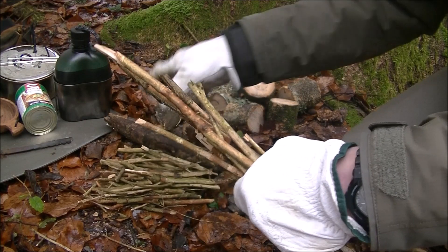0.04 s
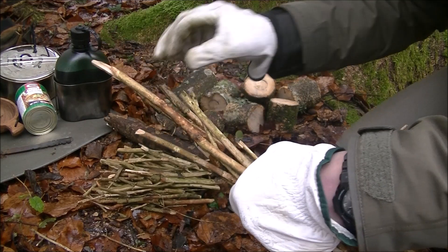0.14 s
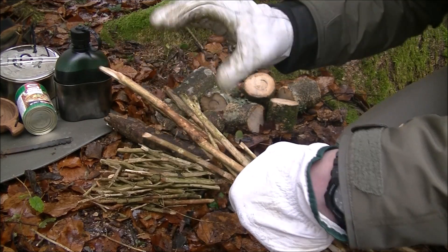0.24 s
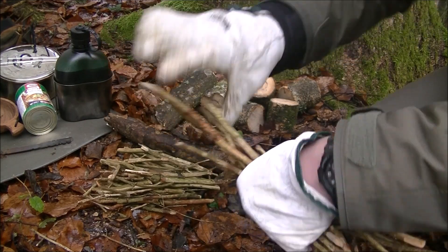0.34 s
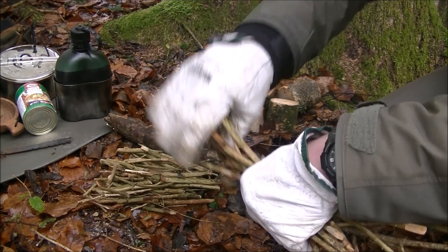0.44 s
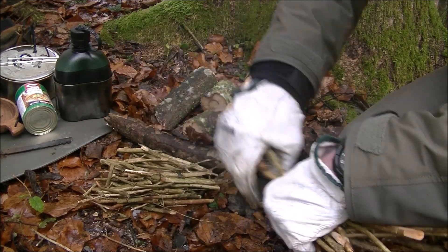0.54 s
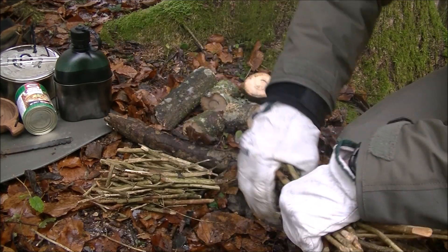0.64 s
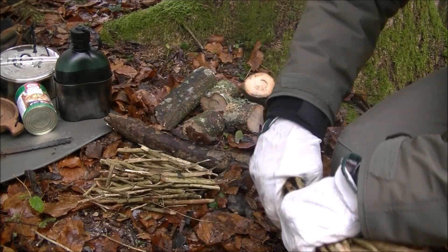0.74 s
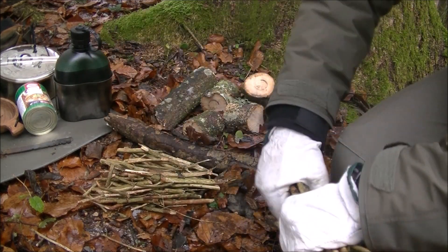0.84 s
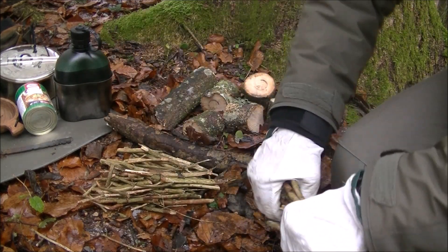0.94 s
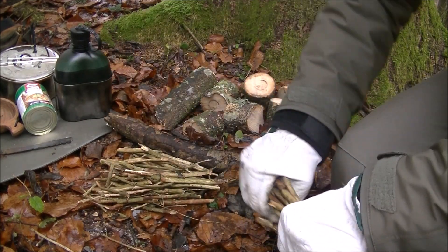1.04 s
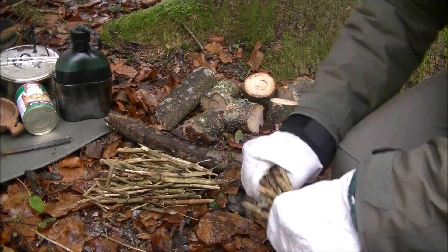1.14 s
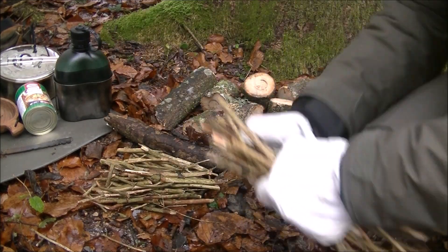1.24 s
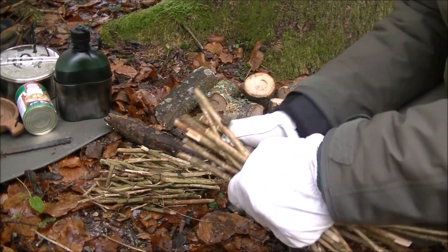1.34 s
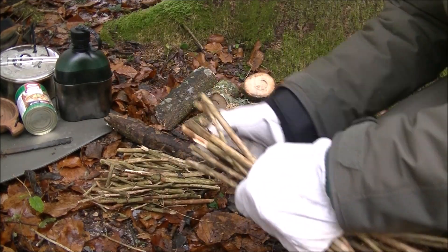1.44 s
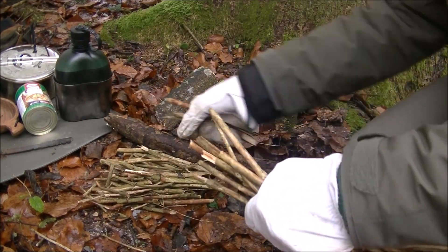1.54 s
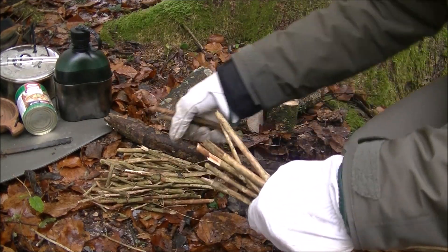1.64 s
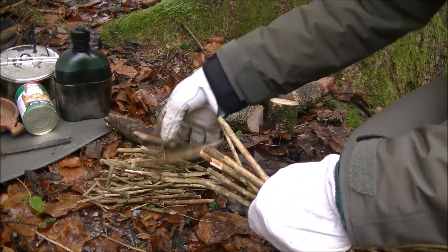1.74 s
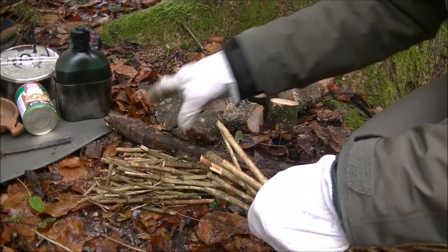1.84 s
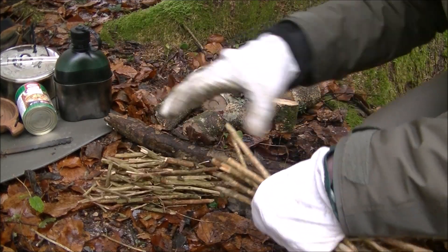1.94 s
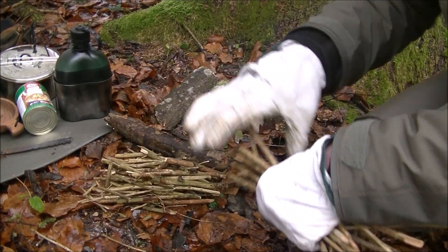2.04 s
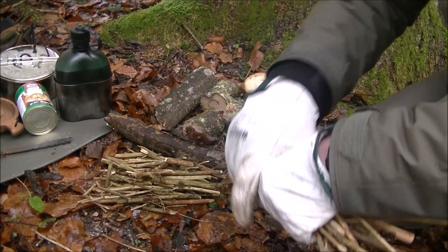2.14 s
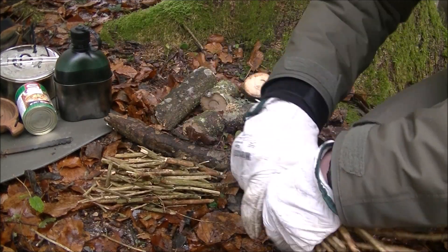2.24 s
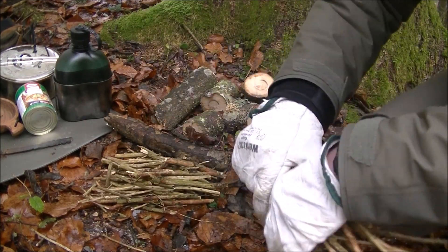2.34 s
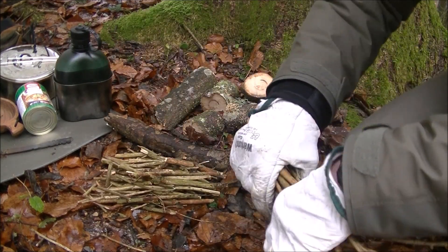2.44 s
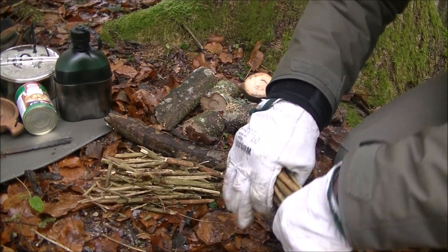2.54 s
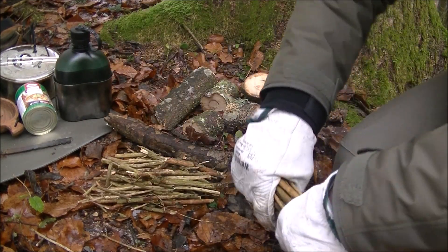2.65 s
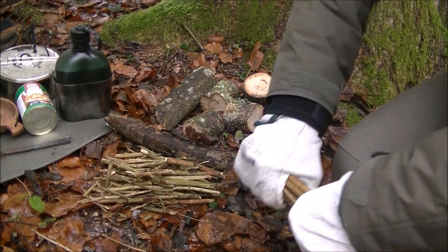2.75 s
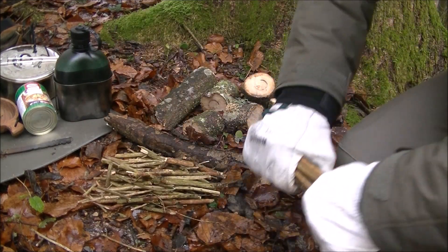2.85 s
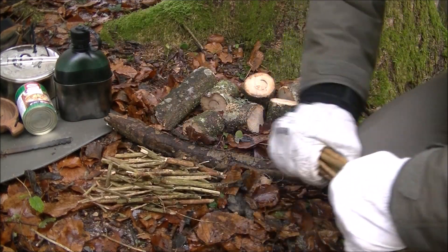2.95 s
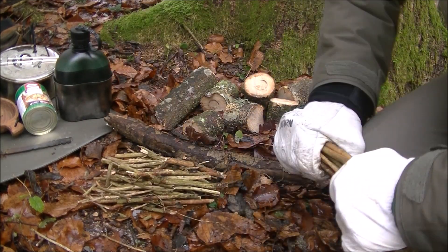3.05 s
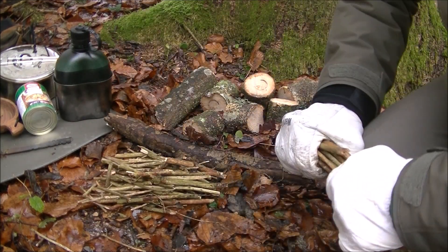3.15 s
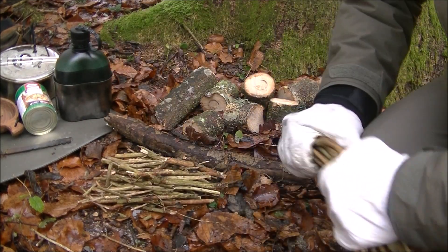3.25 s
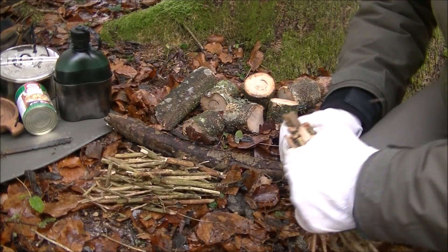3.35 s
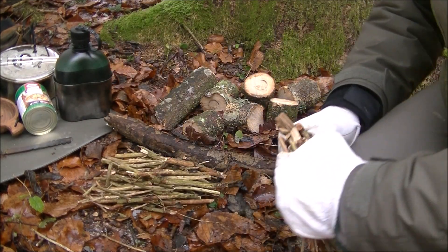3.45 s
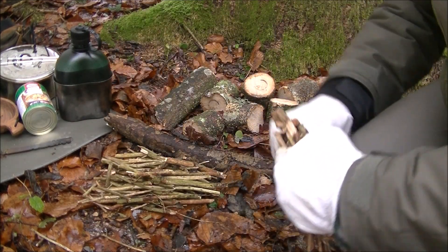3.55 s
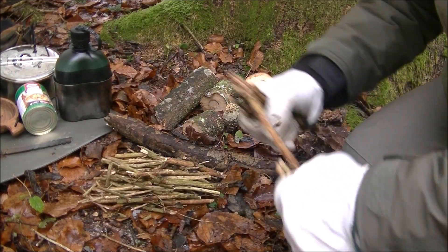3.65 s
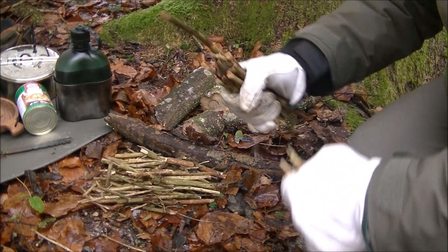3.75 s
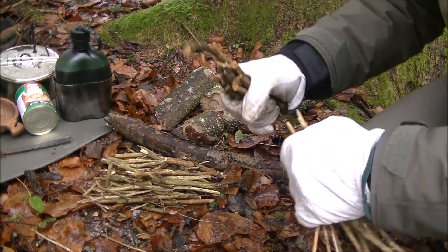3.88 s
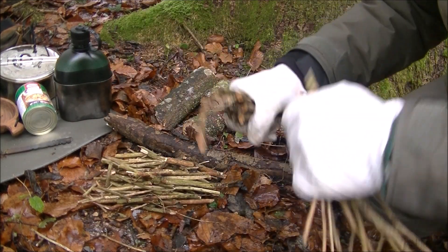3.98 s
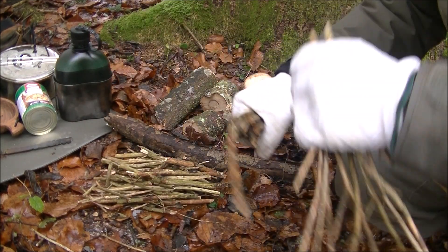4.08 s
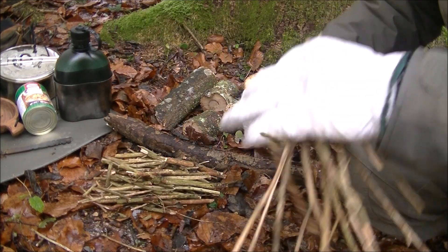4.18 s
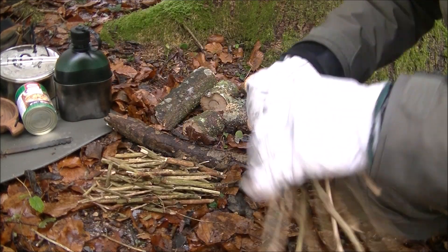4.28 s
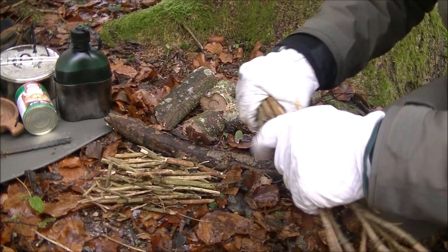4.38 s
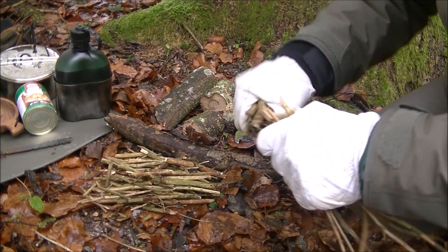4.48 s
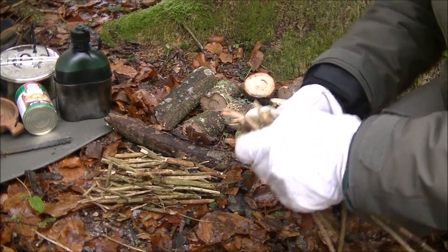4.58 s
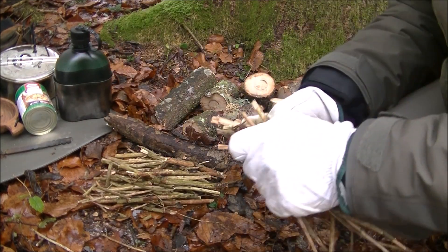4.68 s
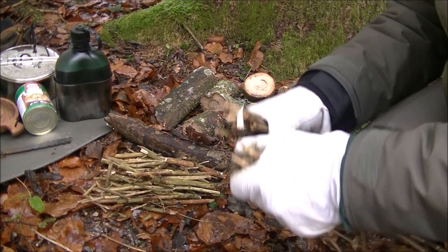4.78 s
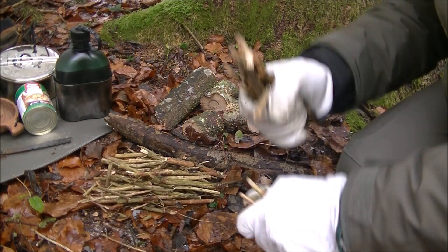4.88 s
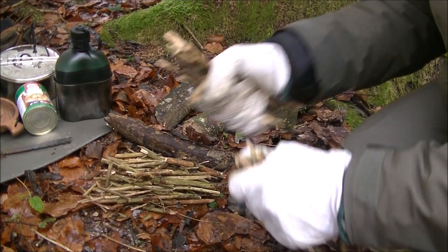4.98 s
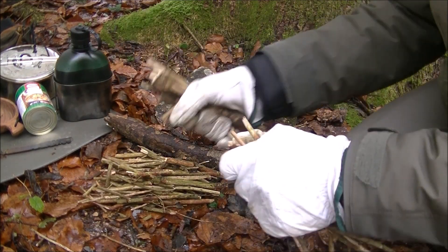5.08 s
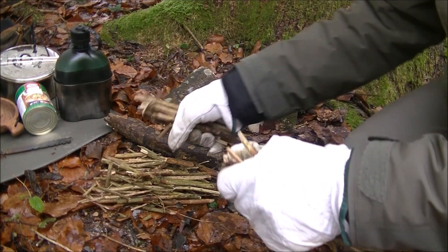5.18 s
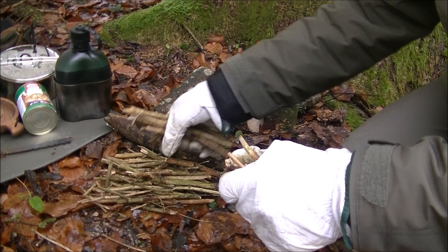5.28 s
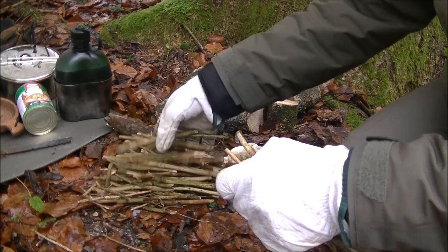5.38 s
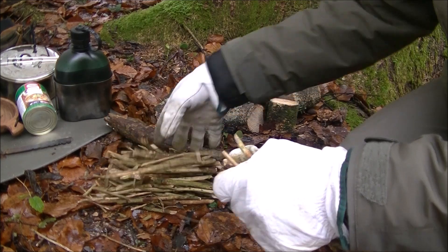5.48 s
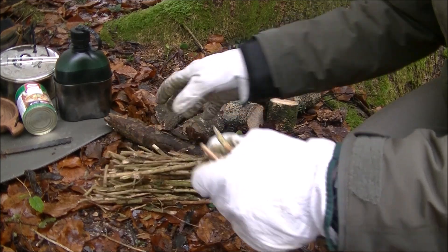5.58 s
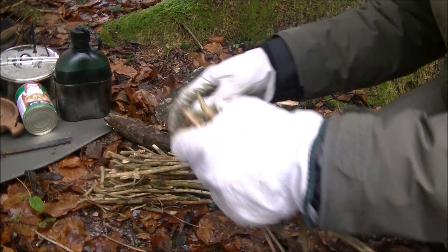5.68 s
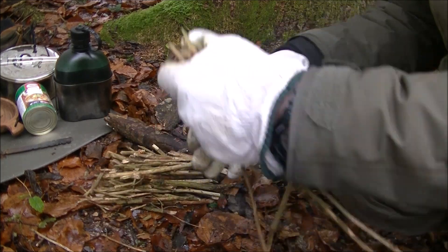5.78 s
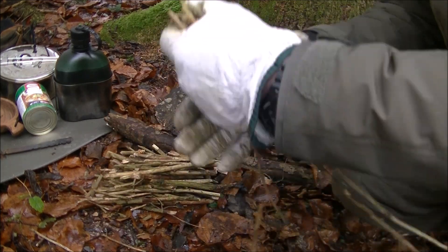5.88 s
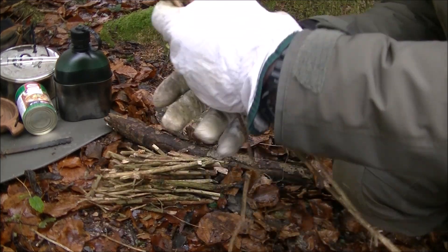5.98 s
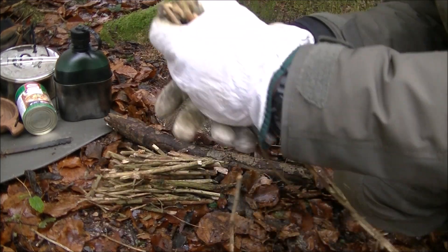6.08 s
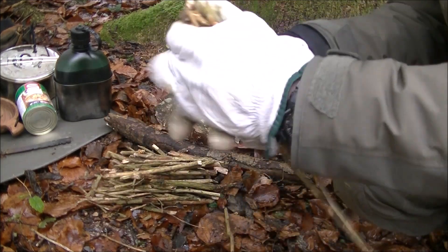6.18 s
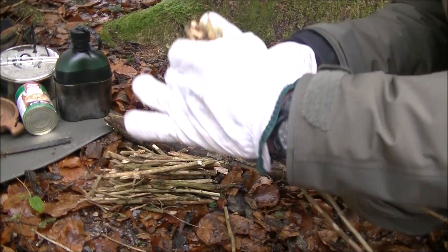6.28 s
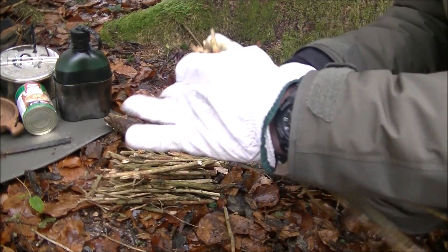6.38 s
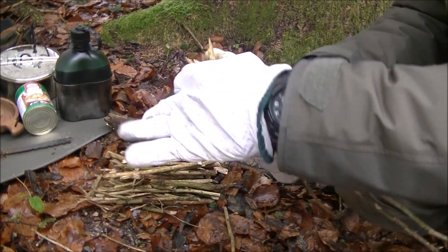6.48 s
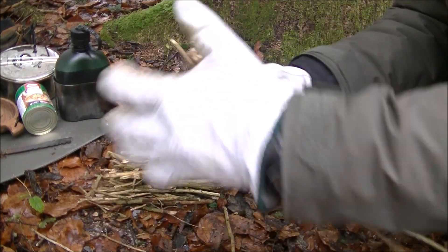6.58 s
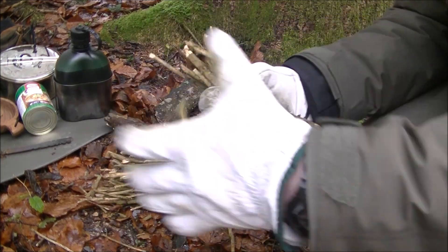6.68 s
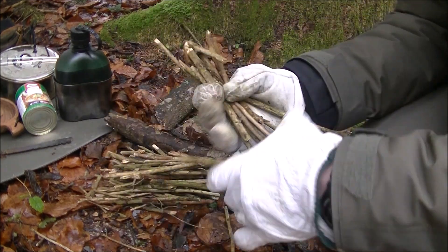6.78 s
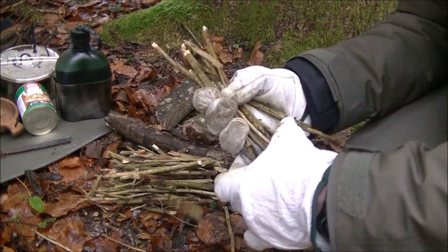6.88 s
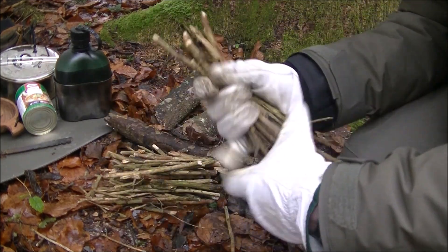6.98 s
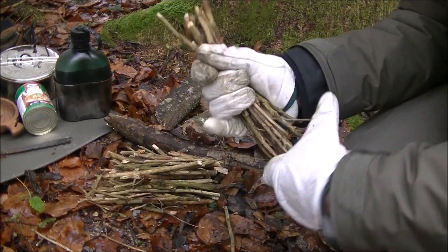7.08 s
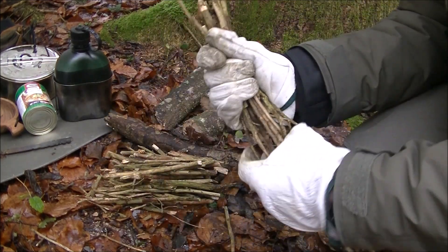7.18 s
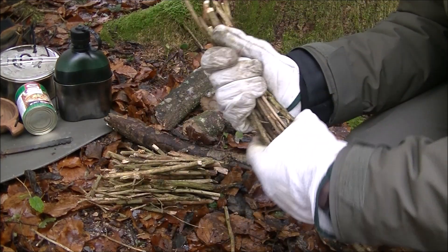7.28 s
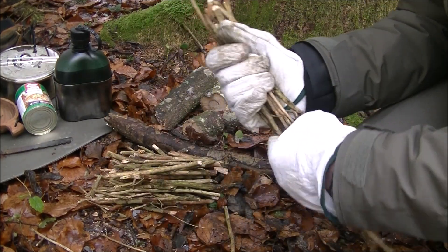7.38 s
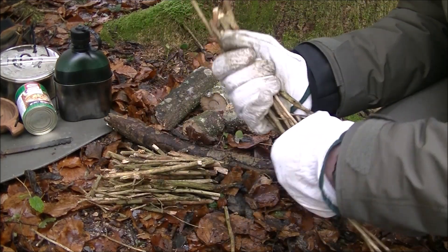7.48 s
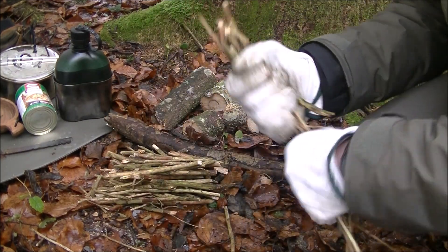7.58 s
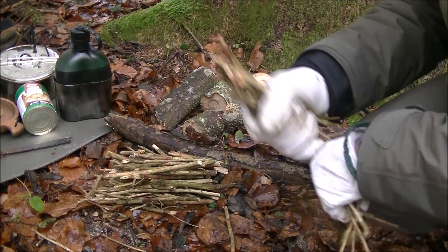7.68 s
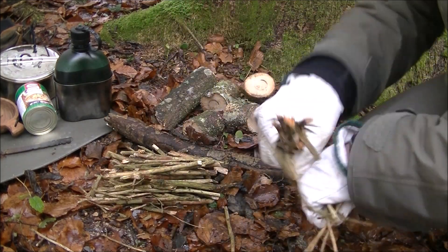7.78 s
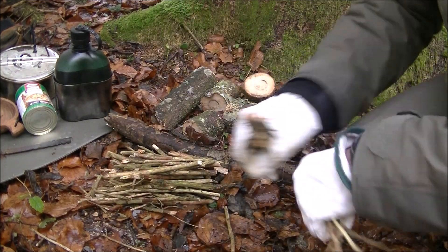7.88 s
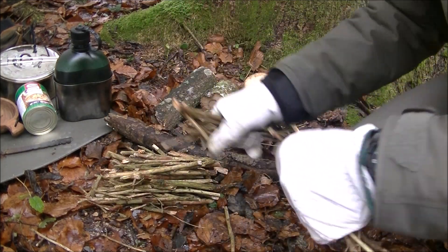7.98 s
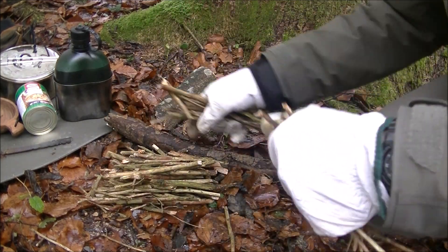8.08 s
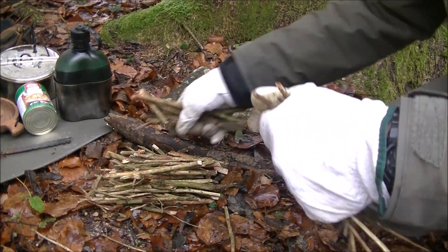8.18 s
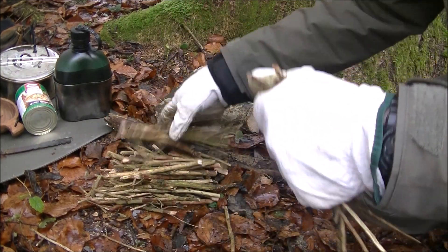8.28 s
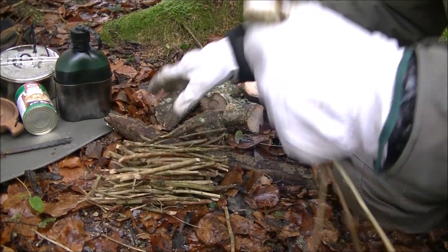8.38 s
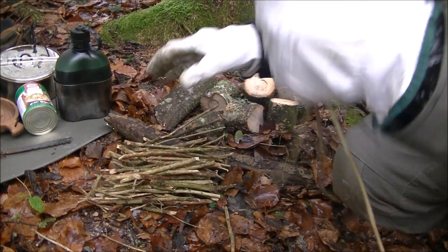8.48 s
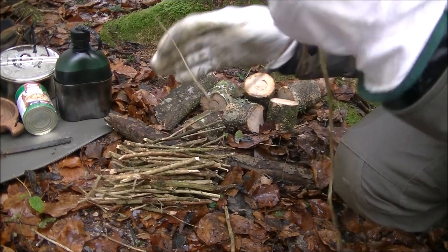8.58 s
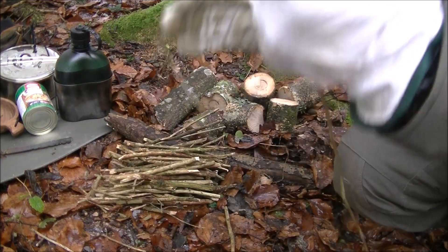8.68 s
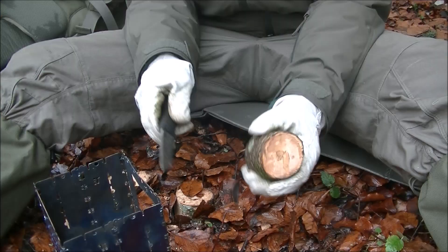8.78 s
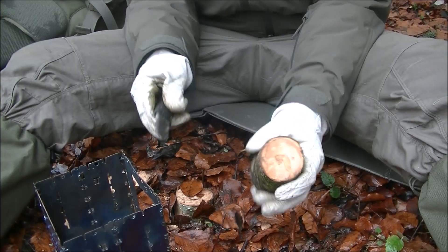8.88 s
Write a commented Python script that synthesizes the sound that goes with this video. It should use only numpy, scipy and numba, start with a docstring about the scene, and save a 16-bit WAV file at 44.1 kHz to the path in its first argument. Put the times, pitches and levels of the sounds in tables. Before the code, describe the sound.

Brittle woody snaps, very near a small stereo microphone outdoors, over an even hiss of far-off running water. Bark and gloves scratch and rustle, thicker sticks bump dully, and two low knocks jolt the stand early. Isolated cracks tighten into three fierce crackling runs, the second long and dense, the last short and sharp, before the handling thins to a few small ticks. Little echo, only faint woodland scatter.

```python
"""Gloved hands gather, bend and break a bundle of dead twigs close to a small stereo camera in a damp wood.
From the start far-off running water hisses (shaped noise), bark and gloves rustle (dense random clicks)
and low rumble stirs (slow noise). Fibres crack singly (noise bursts ringing twig modes), thicker sticks bump
(low damped modes), and before 1 s two knocks come through the stand (a bank of modes). Cracks run together
near 1.2, 3.2 and 7.6 s; gain control ducks at the loudest, then recovers."""
import sys
import numpy as np
from scipy import signal
from scipy.fft import rfft, irfft
from scipy.io import wavfile
from scipy.ndimage import uniform_filter1d
from numba import njit

SR = 44100
rng = np.random.default_rng(int(sys.argv[2]) if len(sys.argv) > 2 else 0)


def makeup_ratio(level_db):
    """Linear amplitude ratio for a level in decibels (20 dB per factor of ten)."""
    decades = np.asarray(level_db, float) / 20
    return 10 ** decades


def transcribe(signal):
    """Save signal, clipped to [-1, 1], as a 16-bit WAV file at the path in sys.argv[1]."""
    frames = np.atleast_2d(signal).T
    limited = np.clip(frames, -1, 1)
    pcm = np.round(limited * 32767).astype(np.int16)
    wavfile.write(sys.argv[1], SR, pcm)


N = 393813

# gloves working the bundle: start_s, level_db (of the fine treble), brightness_db (relative)
HANDLING = [(0.0, -55.5, -4), (0.234, -57, -8), (0.31, -47.5, -2), (0.576, -44.5, 1), (0.9, -49.5, -7.5),
            (1.17, -47.5, 7), (1.241, -30, -4), (1.3, -32.5, -1), (1.4, -43, 0), (1.68, -46, 2),
            (1.759, -62.5, -9), (2.019, -48.5, 1), (2.52, -57.5, -3), (2.55, -31.5, 4), (2.65, -44, -2.5),
            (3.059, -55.5, -0.5), (3.21, -42.5, -0.5), (3.27, -28, 6), (3.451, -43, -2.5),
            (3.669, -42, 3.5), (3.77, -50.5, -4), (4.601, -42, 1.5), (5.001, -51, -4), (5.318, -66, -11),
            (5.871, -45.5, -2.5), (6.0, -58, -2), (6.209, -43, 2.5), (6.3, -62.5, 3), (6.65, -51.5, -4),
            (6.87, -54.5, -3.5), (7.038, -41, -1.5), (7.1, -56, 0), (7.57, -46.5, -2), (7.641, -34, 10),
            (7.75, -36.5, 2), (7.89, -58, -7), (8.641, -65, 4), (8.84, -49, -2), (8.93, -53, 0)]
# spectrum of rubbing bark and gloves as finally heard, closed at 16 kHz: frequency_hz, density_db (relative)
RUSTLE_SPECTRUM = [(300, -53), (800, 6), (1400, 0), (2200, 8.5), (4200, 4), (6500, 7.5), (9000, 1),
                   (12000, 2), (14500, 1.5), (15700, -14), (16000, -70)]
# spectrum of distant water as finally heard, closed at 16 kHz: frequency_hz, density_db (relative)
WATER_SPECTRUM = [(15, -83), (25, -38), (200, -17), (290, -12.5), (590, -5.5), (1150, -2), (2300, -3),
                  (3500, -5), (4500, -10), (5000, -12.5), (7200, -14), (8200, -26.5), (9500, -23.5),
                  (13500, -29), (15700, -39), (16000, -70)]
# stereo width of the water: frequency_hz, side_over_mid_db (before an overall trim)
WATER_WIDTH = [(60, -9), (110, 3), (200, -1.5), (380, -7), (700, -11.5), (1290, -13.5), (2380, -12),
               (4400, -9.5), (8120, 1.5), (15000, -1)]
# stereo balance of the water: frequency_hz, left_over_right_db
WATER_BALANCE = [(60, 1), (110, -3.5), (200, -4), (380, -4.0), (700, -4), (1290, -4), (2380, -4),
                 (4400, -3), (8120, 6.5), (15000, -4)]
# air stirred by the sleeves: start_s, level_db
AIR_PUFFS = [(1.27, -46), (2.17, -68), (3.2, -62), (3.72, -63), (4.16, -70), (4.58, -63), (4.8, -60),
             (6.92, -57), (8.83, -72)]
# cracks that stand out: start_s, level_db, pitch_hz (twig ring), treble_db (over the body), left_over_right_db
CRACKS = [(0.1466, -12, 2190, -26, -5), (0.2896, -23, 4260, 2, -1), (0.295, -14, 4100, -18, -6),
          (0.3804, -26, 3100, 3, -3), (0.5506, -19, 3980, -23, -5), (0.6338, -17.5, 1380, -8, -4),
          (1.0196, -11, 5470, -3, -7), (1.069, -7, 4500, 4.5, 2), (1.12, -15.5, 4000, 7.5, 2),
          (1.1916, -4, 4550, 4, -5), (1.2018, -3.5, 4460, 4, 10), (1.225, -8, 1240, -4, 1),
          (1.2285, -2, 3550, -1, -3), (1.232, -17, 4070, 1, -3), (1.235, -4, 3120, -13, -2),
          (1.239, 1, 4100, -10, 0), (1.2477, -4, 4750, 2.5, -6), (1.2685, -13, 3190, -2, -7),
          (1.3064, -23, 4160, -15, -2), (1.3209, -2, 2030, -35, -1), (1.336, 2.5, 1290, -36, -4),
          (1.781, -25.5, 2150, 3, -3), (1.8117, -22.5, 4260, -3, -6), (2.0165, -24.5, 3920, 3, 5),
          (2.2343, -13.5, 6370, -6, 3), (2.26, -21, 4130, -4, -2), (2.3516, -12.5, 2300, -2, -1),
          (2.3997, -13, 2540, 2.5, 0), (2.5344, -13, 3600, -5, -4), (2.541, -15, 5450, 0, 0),
          (2.5718, -16, 2780, -13, -2), (2.5885, -23, 4200, -4, 0), (2.6865, -24, 4410, 2, -2),
          (2.7073, -8.5, 3600, 1.5, 6), (2.7235, -27, 4150, 8, 4), (2.7268, -12.5, 3480, 9, -4),
          (2.7342, -29, 4590, 2, -1), (2.7931, -32, 1550, 9, -1), (2.8184, -25.5, 2670, 9, 1),
          (2.8821, -9, 1100, -18, -3), (2.9274, 2, 5050, -2, -1), (2.9341, -26, 3770, -55, -12),
          (2.9379, -25, 4120, 3, -1), (3.0466, -22.5, 2630, -1, -2), (3.0904, -28, 3600, 4, 0),
          (3.1161, -9.5, 6560, 2, 6), (3.1343, -1, 4000, -17, -5), (3.149, -1, 4140, -10, -2),
          (3.17, -6.5, 6500, 8, 2), (3.2265, 3.5, 3700, -7, -1), (3.231, -15, 3600, -13, -4),
          (3.2373, -1, 4300, -6, 1), (3.2424, -13, 3800, 13, -1), (3.249, -15, 4410, 2, -2),
          (3.2538, -10, 3530, 4, -3), (3.2581, -13, 6310, 5, -1), (3.2614, -12, 4160, 11, 2),
          (3.271, -11, 4010, 3, -1), (3.2751, 1, 3760, 2, 0.5), (3.2855, -4, 3830, 4, -6),
          (3.303, 0.5, 4500, -2, 4), (3.309, -13, 4410, -6, 0), (3.3119, -1, 3570, 1, -2),
          (3.341, -9.5, 1710, -1, -4), (3.3597, -9, 2860, 0, 0), (3.3627, -11, 4290, -17, -5),
          (3.372, -9.5, 2650, -13, -3), (3.3786, -7, 6960, -8, 2), (3.4232, -2, 1980, -10, -2),
          (3.4253, -5.5, 4160, -19, -3), (3.48, -14, 2420, -6, -3), (3.5775, -18.5, 4000, -10, -2),
          (3.6831, -15, 1520, -9, -3), (3.7673, -18.5, 1630, -26, -3), (3.873, -19, 5940, -11, -1),
          (3.903, -20, 2330, -20, -2), (3.9446, -15, 2870, -19, -13), (4.0415, -13.5, 3020, -24, -4),
          (4.3287, -14.5, 3040, -21, -5), (4.401, -21, 1710, -20, -3), (4.469, -21, 1570, -16, -3),
          (4.4929, -20, 2410, -4, 3), (4.5374, -12.5, 3850, -12, -2), (4.5591, -9.5, 3200, -5, -4),
          (4.567, -13, 2200, -20, -3), (4.596, -7, 4330, -6, -3), (4.6, -4, 4300, 1, -5),
          (4.6115, -27, 2070, 15, 2), (4.736, -13.5, 1380, -21, -4), (4.7715, -18, 4040, 6, -1),
          (4.7832, -16, 4870, 0, -4), (4.7877, -11, 3220, -3, -2), (4.8266, -15, 3020, 14, -1),
          (5.0586, -14, 2070, -17, -2), (5.062, -12.5, 3580, -25, -2), (5.035, -17, 2110, -12, -5),
          (5.0986, -20, 2090, -18, -2), (5.0918, -16, 3040, -18, -4), (5.275, -18.5, 4770, -31, -3),
          (5.403, -17.5, 4200, -1.5, -2), (5.4314, -14.5, 4750, -13, -3), (5.722, -21, 2930, -20, -3),
          (5.7323, -4.5, 2450, -34, -4), (5.8807, -12, 2370, -5, -1), (6.142, -18, 1480, -15, -3),
          (6.2425, -11, 3120, 4, -9), (6.401, -24, 2480, 1.5, -1), (6.4177, -13, 1230, -21, -4),
          (6.5432, -17.5, 3530, -12, -4), (6.587, -15, 1460, -18, -4), (6.6182, -16, 2460, -28, -4),
          (6.7147, -11, 2150, -39, -2), (6.742, -13.5, 4800, 5.5, 0), (6.782, -18, 3820, 6, 1),
          (6.8216, -10.5, 2230, -19, -2), (6.917, -7.5, 6500, -12, -1), (6.93, -10.5, 4250, -7, -5),
          (6.936, -6, 6000, -12, 5), (7.0029, -8.5, 2460, -2, -2), (7.0075, -3, 2500, -23, -1),
          (7.0147, -5, 2440, -7, -3), (7.0335, -17, 4590, 10, 0), (7.1287, -6, 4600, -9, -3),
          (7.1354, -20, 4360, 11, 6), (7.1424, -3.5, 2380, -5, -1), (7.156, -1.5, 6300, -13, -3),
          (7.3144, -22.5, 4000, -9, -3), (7.4655, -16, 2000, -19, -3), (7.476, -17, 4910, -11, -1),
          (7.5006, -11, 4700, -11, -2), (7.5944, -2, 3930, -6, -8), (7.6069, -8, 3750, 4.5, 7),
          (7.6096, -6, 4120, 2, -4), (7.6178, -10, 4220, -2, 0), (7.6232, -6, 3930, -1, -7),
          (7.629, -9, 4070, 3, -5), (7.644, -9, 2880, 9, 6), (7.6595, -14.5, 6780, 13, -7),
          (7.683, -5, 4410, 2, -1), (7.6885, -8, 4350, -9, -4), (7.707, -3, 1780, 2.5, -3),
          (7.7291, 4, 4500, -5, -4), (7.7316, -13, 4180, -6, -1), (7.7406, -16, 3490, -11, 7),
          (7.746, 4, 4080, -7, -3), (7.7567, -7.5, 2650, -17, -4), (8.301, -19.5, 1870, -21, -4),
          (8.325, -17, 3360, -4, -2), (8.338, -14.5, 1830, -15, -3), (8.8755, -18, 6100, -23, 1)]
# dull bumps of thicker sticks: start_s, level_db, pitch_hz
BUMPS = [(0.302, -19.5, 1000), (0.374, -27, 1160), (1.223, -14, 985), (1.237, -11.5, 1160),
         (1.319, -15, 1240), (1.333, -56, 1170), (1.496, -34, 350), (2.88, -12, 1010), (2.884, -15.5, 725),
         (3.147, -14.5, 1220), (3.339, -23, 1090), (3.408, -29, 804), (3.74, -23, 1050),
         (3.765, -28.5, 474), (4.035, -24.5, 770), (4.466, -28, 435), (4.516, -27.5, 740),
         (4.558, -17, 950), (4.733, -28.5, 330), (4.929, -34.5, 285), (6.068, -27.5, 580),
         (6.144, -24.5, 754), (6.212, -23.5, 664), (6.782, -26, 633), (6.82, -23.5, 1070),
         (7.008, -19.5, 1160), (7.141, -23.5, 930), (7.554, -24.5, 1040), (7.726, -30, 965),
         (7.737, -17, 835)]
# knocks on the stand: start_s, level_db, hardness_db
KNOCKS = [(0.789, -5, -6), (0.887, -7, 8)]
# modes of the stand: pitch_hz, mid_db, side_db, t60_s, hardness_share (0-1)
STAND_MODES = [(164, -16, -17, 0.1, 0), (209, -24, 0, 0.14, 0.1), (228, 6.5, -23, 0.056, 0),
               (338, -4.5, 6, 0.1, 0.15), (329, -7, -5, 0.035, 0.1), (647, -6, -7, 0.039, 0.2),
               (783, -14, -13, 0.046, .5), (1040, -18, -21, 0.23, 0.9), (1380, -20, -24, 0.2, 0.7),
               (1976, -11, -17, 0.046, 0.8), (2200, -6.5, -21, 0.03, 0.9)]
# resonances of the microphone ports: centre_hz, width_hz, gain_db
PORT_RESONANCES = [(4160, 630, 5.5), (9250, 4700, -7.5), (15000, 700, 6)]


def colour(x, table):
    """Linear filtering: shape the last axis by (Hz, dB) points joined on a log frequency axis."""
    hz, db = np.transpose(table)
    f = np.arange(x.shape[-1] // 2 + 1) * SR / x.shape[-1] + 1
    gain = makeup_ratio(np.interp(np.log(f), np.log(hz + 1), db))
    return irfft(rfft(x) * gain, x.shape[-1])


def band(x, lo_hz, hi_hz):
    """Band limitation: a causal Butterworth band-pass along the last axis."""
    sos = signal.butter(2, [lo_hz, min(hi_hz, .45 * SR)], "band", fs=SR, output="sos")
    return signal.sosfilt(sos, x)


def peak1(rows):
    """Normalisation: each row scaled to peak 1."""
    return rows / np.abs(rows).max(axis=-1, keepdims=True)


def set_rms(x, db):
    """Normalisation: scale to an rms level."""
    return x * makeup_ratio(db) / np.sqrt(np.mean(x ** 2))


def walk(rate_hz):
    """Slow fluctuation: random levels held for 1 / rate and smoothed twice; spread about 1.3."""
    k = int(SR / rate_hz)
    held = np.repeat(rng.standard_normal(N // k + 1), k)
    return 2.06 * uniform_filter1d(uniform_filter1d(held, k), k)[:N]


def place(times, left, right):
    """Superposition: add short sounds to two channels at their times."""
    out = np.zeros((2, N + left.shape[1]))
    for s, a, b in zip(times, left, right):
        i = max(int(s * SR), 0)
        out[:, i:i + len(a)] += a, b
    return out[:, :N]


def ring(hz, t60, t):
    """Free damped vibration: a sine that starts at rest and falls 60 dB in t60."""
    return np.sin(2 * np.pi * hz * t) * np.exp(-np.log(1000) * t / t60)


def after(table, rise_s, fade_s):
    """Energy storage and decay: power that each (s, dB, ..) event leaves builds up, then fades."""
    s, db = np.transpose(table)[:2]
    power = np.zeros(N)
    np.add.at(power, (s * SR).astype(int), makeup_ratio(2 * db))
    for time_s in (rise_s, fade_s):
        # power falls twice as fast as amplitude
        power = signal.lfilter([1], [1, -np.exp(-2 / (time_s * SR))], power)
    return power * 2 / (rise_s * SR)


def rustle():
    """Frictional noise: rubbing makes dense tiny clicks of very uneven size, following handling and cracks."""
    s, *columns = np.transpose(HANDLING)
    db, bright_db = (np.interp(np.arange(N) / SR, s, c) for c in columns)
    # loose fibres keep rubbing after a crack, 32 dB under its level and any treble deficit
    splinters = [(s, crack_db + min(treble_db, 0)) for s, crack_db, _, treble_db, _ in CRACKS]
    splinter_power = makeup_ratio(2 * -32) * after(splinters, rise_s=.001, fade_s=0.03)
    db = 10 * np.log10(makeup_ratio(2 * db) + splinter_power)
    # about 2500 clicks a second, each a scratch of a fraction of a millisecond
    clicks = (rng.random((2, N)) < 2500 / SR) * makeup_ratio(2.3 * rng.exponential(size=(2, N)))
    scratch_decay = np.exp(-1 / (0.00084 * SR))
    scratch = signal.lfilter([1], [1, -scratch_decay], clicks) * rng.standard_normal((2, N))
    scratch = scratch / scratch.std() + .5 * rng.standard_normal((2, N))
    stereo = scratch[0] + 0.45 * scratch[1] * np.array([[1], [-1]])
    flicker_db = 2 * walk(40)
    pair = colour(stereo, RUSTLE_SPECTRUM) * makeup_ratio(flicker_db)
    top = band(pair, 8980, 16500)
    # a firmer grip damps the sticks and leaves only the fine treble
    rest = (pair - top) * makeup_ratio(-bright_db + 2.5)
    return (top + rest) / top.std() * makeup_ratio(db + np.array([[-.7], [.7]]))


def water():
    """Broadband turbulence noise: a smooth distant hiss, mostly alike in both channels and leaning right."""
    mid, side = rng.standard_normal((2, N))
    side = colour(side, WATER_WIDTH) * makeup_ratio(-1.0)
    balance = np.array(WATER_BALANCE)
    left = colour(mid + side, balance * [1, .5])
    right = colour(mid - side, balance * [1, -.5])
    swell_db = .4 * walk(2.8)
    return set_rms(colour(np.array([left, right]), WATER_SPECTRUM), -34.5) * makeup_ratio(swell_db)


def rumble():
    """Uncorrelated excitation: jolts and puffs of air stir two capsules separately at very low frequency."""
    low = band(band(rng.standard_normal((2, N)), 52, 83), 25, 87)
    steady_db = -84.5 + 1.5 * walk(3.7)
    stirred = 0
    for table, jolt_db in ((CRACKS, -64.5), (KNOCKS, -42), (AIR_PUFFS, 0)):
        stirred = stirred + makeup_ratio(2 * jolt_db) * after(table, rise_s=.02, fade_s=0.043)
    # the right channel is 4 dB stronger
    return set_rms(low, 0) * np.sqrt(makeup_ratio(2 * steady_db) + stirred) * makeup_ratio(np.array([[0], [4]]))


def ticks():
    """Random point process: faint cracks, likelier while hands are busy, in rows like those of CRACKS."""
    count, lo_hz, hi_hz = 110, 1290, 4600
    busy = .4  # how far the tick rate follows the rustle level
    s, db, _ = np.transpose(HANDLING)
    t = np.arange(0, N, 64) / SR
    share = np.cumsum(makeup_ratio(busy * np.interp(t, s, db)))
    u = rng.random((count, 2)).T
    g = rng.standard_normal((count, 3)).T
    start_s = np.interp(u[0], share / share[-1], t)
    level_db = -27 + 3.5 * g[0]
    pitch_hz = lo_hz * (hi_hz / lo_hz) ** u[1]
    treble_db = -16.5 + 6 * g[1]
    pan_db = -1.5 + 2.5 * g[2]
    return np.transpose([start_s, level_db, pitch_hz, treble_db, pan_db])


def cracks():
    """Impulsive fracture: a tear of about a millisecond rings the twig; splinters and trunks scatter a tail."""
    s, db, hz, treble_db, pan_db = np.vstack([CRACKS, ticks()]).T[:, :, None]
    t = np.arange(1536) / SR
    chance = rng.standard_normal((len(s), 4, len(t)))
    pan_db = np.clip(pan_db, -6, 4)
    tear_ms = 0.65 * np.exp(0.1 * chance[:, 2, :1])  # log-normal scatter
    age = t * 1000 / np.clip(tear_ms, .1, 3)  # time in tear lengths

    def burst(k, slow):
        """Transient noise: a fast rise and a decay over `slow` tear lengths."""
        return chance[:, k] * (1 - np.exp(-age * 9.9)) * np.exp(-age / slow)

    # the twig's main bending mode, a weaker neighbour and a broad halo, each dead after a handful of cycles
    near_hz = hz * np.exp(0.027 * chance[:, 3, :1])
    twig = ring(hz, 12 / hz, t) + .5 * ring(near_hz, 12 / hz, t) + 1.5 * ring(hz, 3.5 / hz, t)
    body = peak1(signal.fftconvolve(burst(0, 1.0), twig, axes=-1)[:, :len(t)])
    snap = peak1(band(band(burst(3, 1.0), 1500, 4500), 830, 7100))
    body = peak1(body + 0.47 * snap)
    thud = makeup_ratio(-26.5) * peak1(band(burst(1, 3.0), 150, 1210))
    treble = makeup_ratio(treble_db) * peak1(band(band(burst(2, 2.5), 4700, 14300), 4640, 14400))
    # the shortest waves reach the two ports unalike
    apart = 0.69 * makeup_ratio(treble_db) * peak1(band(band(burst(3, 0.57), 4500, 8800), 4300, 12000))
    direct = band(body, 820, 16000) + thud + treble
    # every place in the bundle scatters differently
    smear_shape = np.exp(-t[:700] / 0.006) * (1 - np.exp(-t[:700] / 0.0018))
    smear = rng.standard_normal((len(s), 2, 700)) * smear_shape
    tails = makeup_ratio(-24) * signal.fftconvolve(direct[:, None], smear, axes=-1)[..., :len(t)]
    left = makeup_ratio(db + pan_db / 2) * (direct + apart + tails[:, 0])
    right = makeup_ratio(db - pan_db / 2) * (direct - apart + tails[:, 1])
    return place(s[:, 0] - .0002, left, right)


def bumps():
    """Damped modal vibration: soft contact excites a low mode with a neighbour below and above."""
    s, db, hz = np.transpose(BUMPS)[:, :, None]
    t = np.arange(3000) / SR
    t60 = 0.022 * (1000 / hz) ** 0.61  # seconds; lower modes ring longer
    pan_db = -5.5  # left over right
    modes = ring(hz, t60, t) + .5 * ring(0.713 * hz, t60, t) + 0.57 * ring(1.337 * hz, 0.83 * t60, t)
    soft_start = 1 - np.exp(-t / 0.00057)
    bump = peak1(band(modes * soft_start, 200, 2300))
    return place(s[:, 0] - .0005, bump * makeup_ratio(db + pan_db / 2), bump * makeup_ratio(db - pan_db / 2))


def knocks():
    """Structure-borne modes: the stand shakes the capsules together (mid) or against each other (side)."""
    s, db, hard_db = np.transpose(KNOCKS)[:, :, None]
    t = np.arange(8000) / SR
    mid, side = 0, 0
    for hz, mid_db, side_db, t60, share in STAND_MODES:
        # every mode takes a few cycles to build
        build = 1 - np.exp(-t * hz / 7.9)
        mode = ring(hz, t60, t) * build * makeup_ratio(db + share * hard_db)
        mid = mid + makeup_ratio(mid_db) * mode
        side = side + makeup_ratio(side_db) * mode
    # the stand rocks back and knocks again, a moment later
    late = int(.012 * SR)
    mid, side = (x + 0.49 * np.pad(x, ((0, 0), (late, 0)))[:, :len(t)] for x in (mid, side))
    # loose joints rattle for some milliseconds
    rattle = band(rng.standard_normal((2, len(s), len(t))), 520, 2360)
    rattle = rattle * np.exp(-t / 0.017) * makeup_ratio(db + hard_db / 2 - 7.5)
    mid, side = mid + rattle[0], side + rattle[1]
    return place(s[:, 0] - .001, mid - side, mid + side)


def scene():
    """Superposition: the pressures of all sources add at the camera."""
    return rustle() + water() + rumble() + cracks() + bumps() + knocks()


def ports(x):
    """Acoustic resonance: each microphone port resonance lifts or cuts its band."""
    for hz, width_hz, db in PORT_RESONANCES:
        x = x + (makeup_ratio(db) - 1) * signal.lfilter(*signal.iirpeak(hz, hz / width_hz, SR), x)
    return x


@njit
def follow(x, attack, release):
    """Envelope detection: a level that rises fast and sinks slowly."""
    e, out = 0., np.empty(len(x))
    for i in range(len(x)):
        e += (x[i] - e) * (attack if x[i] > e else release)
        out[i] = e
    return out


def gain_control(x):
    """Dynamic compression: two envelopes over their thresholds lower a common gain, which then creeps back."""
    size = np.abs(x).max(axis=0)
    slow = follow(size, 1 / (0.0011 * SR), 1 / (.15 * SR))
    quick = follow(size, 1 / (0.00094 * SR), 1 / (0.084 * SR))
    slow_gain = np.minimum(1, makeup_ratio(-17.0) / (slow + 1e-9)) ** 0.32
    quick_gain = np.minimum(1, makeup_ratio(-9.5) / (quick + 1e-9)) ** 0.27
    return x * slow_gain * quick_gain


def roll_off(x):
    """The treble ends steeply here."""
    return signal.sosfilt(signal.butter(12, 16990, fs=SR, output="sos"), x)


def record(dry):
    """Transduction: the ports colour the sound, gain control ducks the loud cracks, and peaks clip."""
    mix = np.clip(gain_control(ports(dry)), -1, 1)
    return roll_off(mix)


dry = scene()
out = record(dry)
transcribe(out)
```